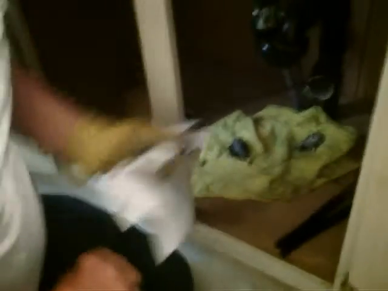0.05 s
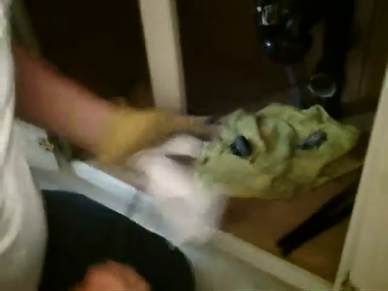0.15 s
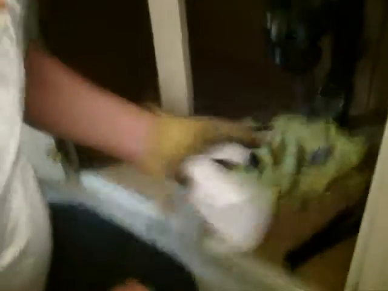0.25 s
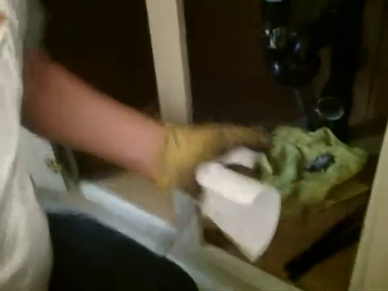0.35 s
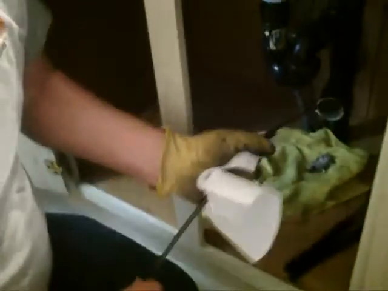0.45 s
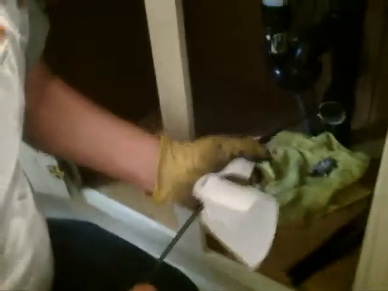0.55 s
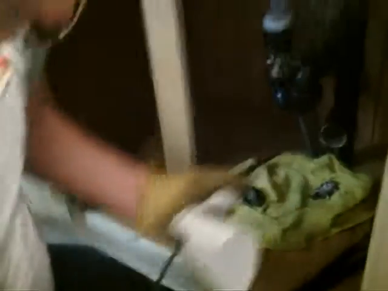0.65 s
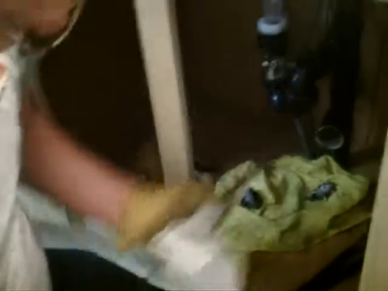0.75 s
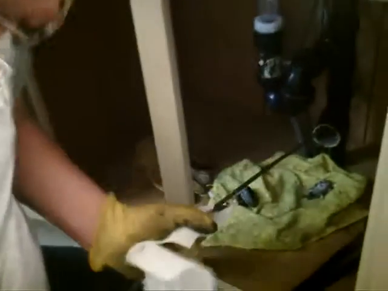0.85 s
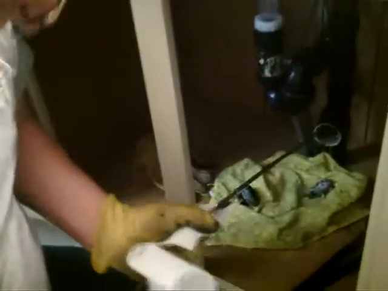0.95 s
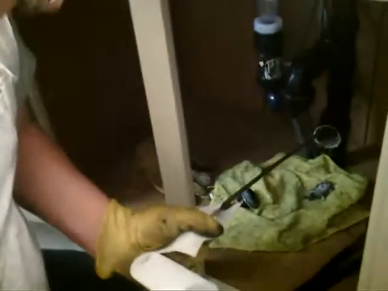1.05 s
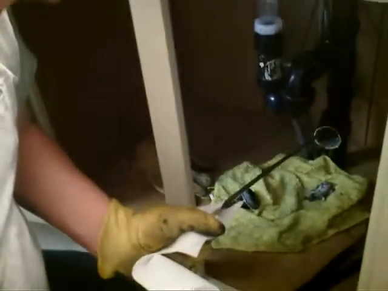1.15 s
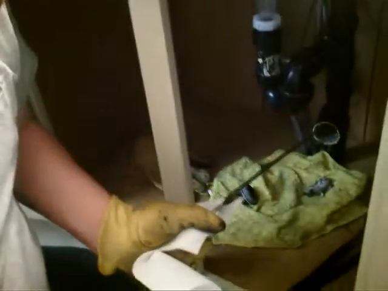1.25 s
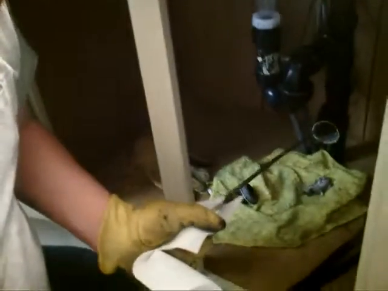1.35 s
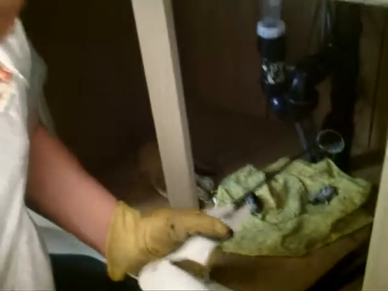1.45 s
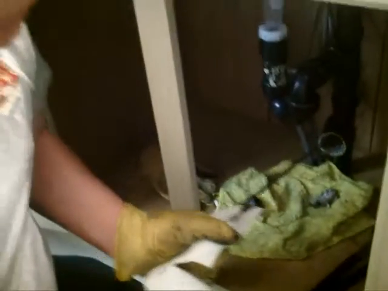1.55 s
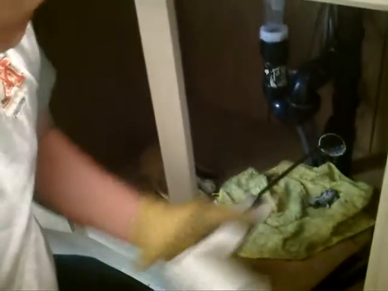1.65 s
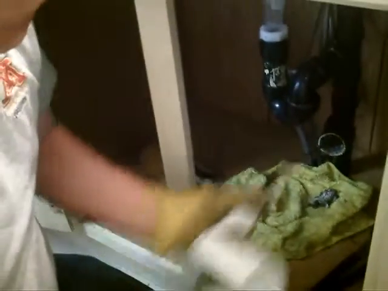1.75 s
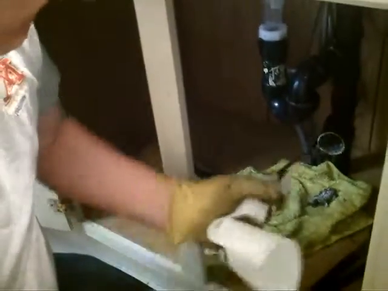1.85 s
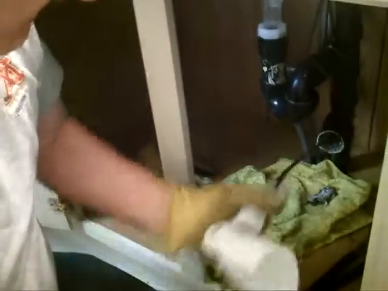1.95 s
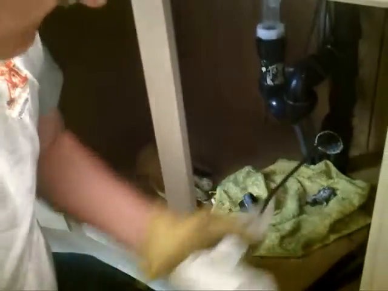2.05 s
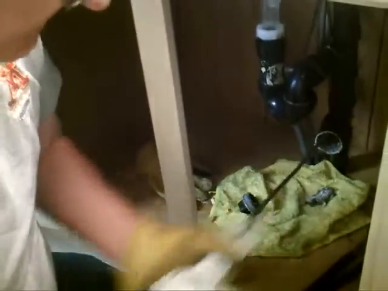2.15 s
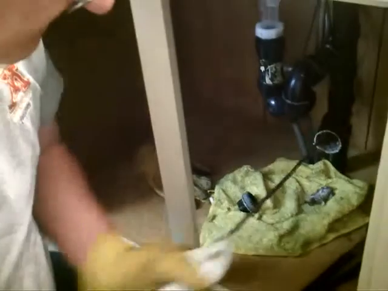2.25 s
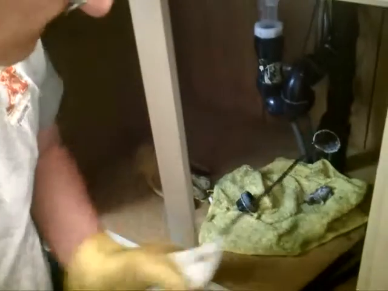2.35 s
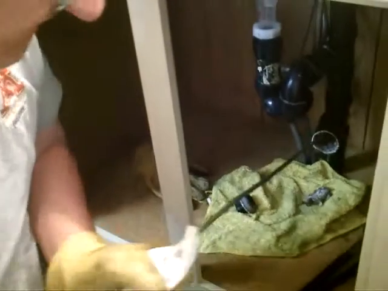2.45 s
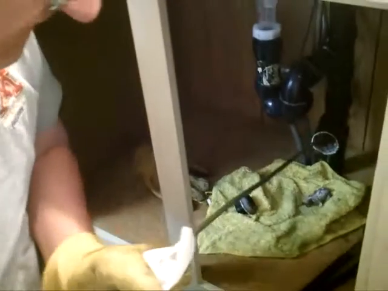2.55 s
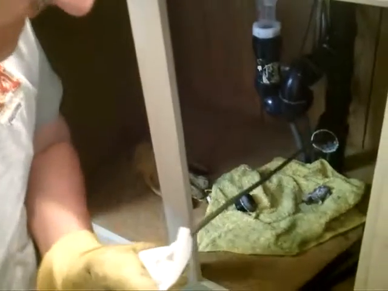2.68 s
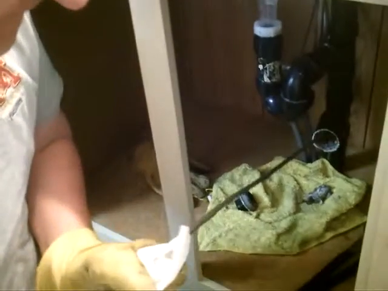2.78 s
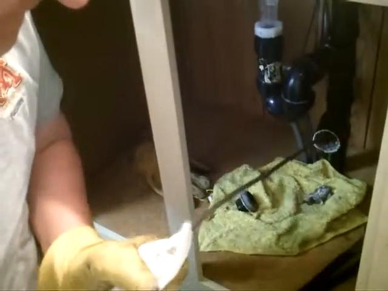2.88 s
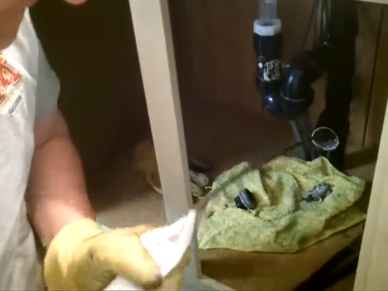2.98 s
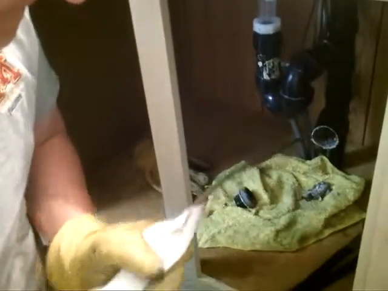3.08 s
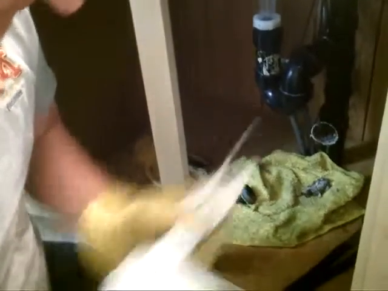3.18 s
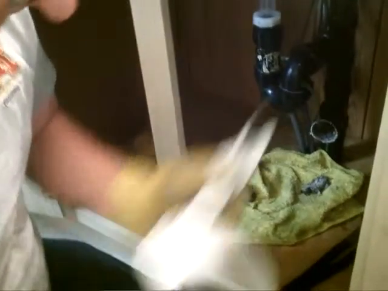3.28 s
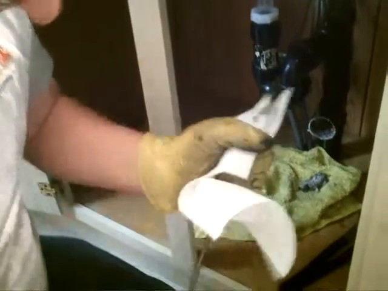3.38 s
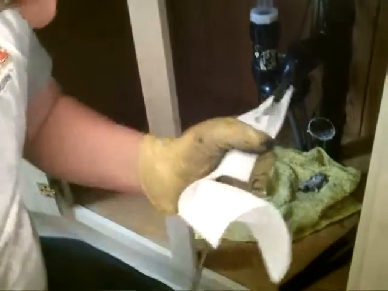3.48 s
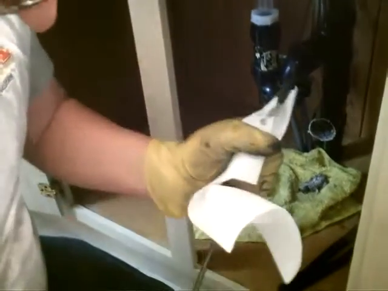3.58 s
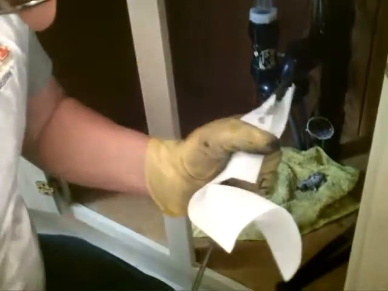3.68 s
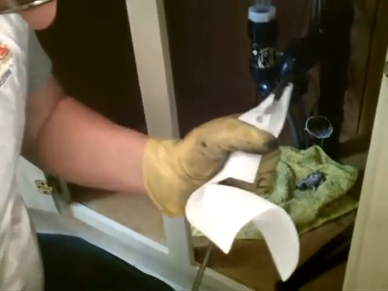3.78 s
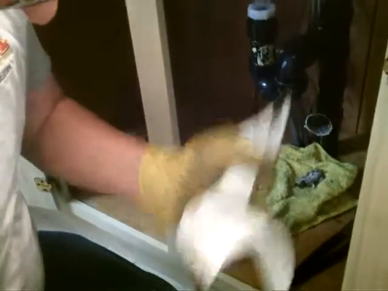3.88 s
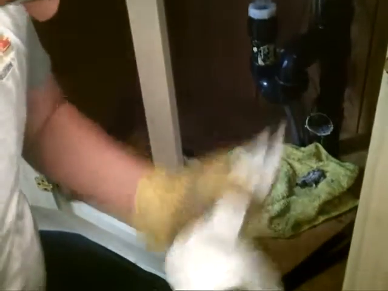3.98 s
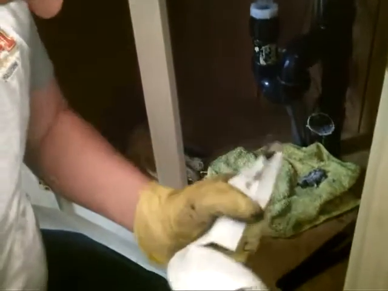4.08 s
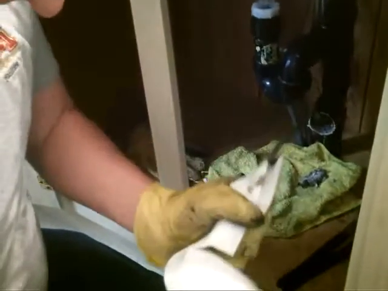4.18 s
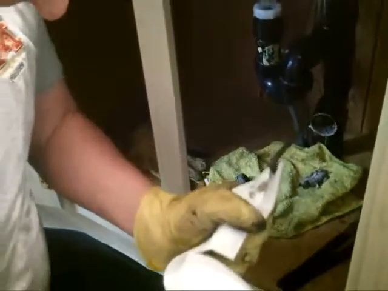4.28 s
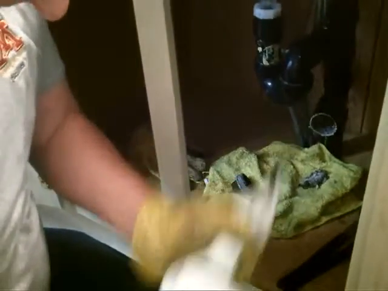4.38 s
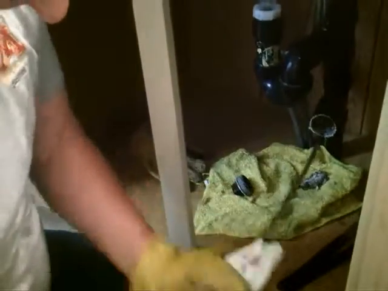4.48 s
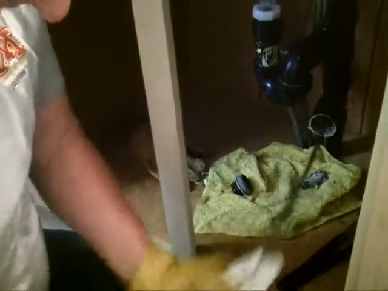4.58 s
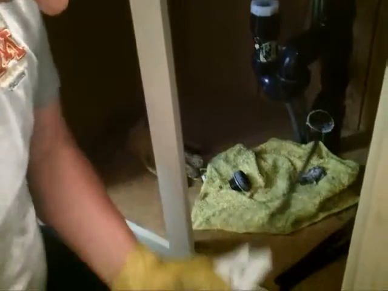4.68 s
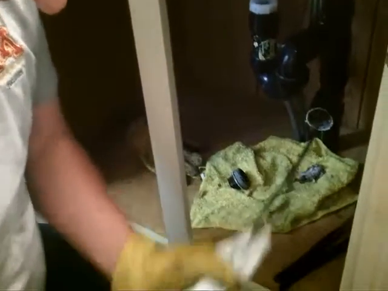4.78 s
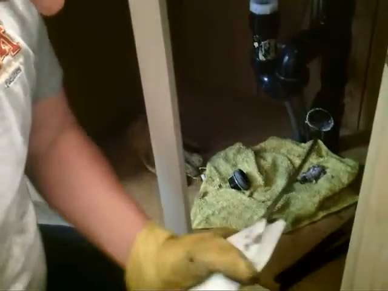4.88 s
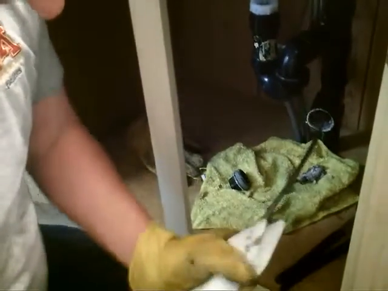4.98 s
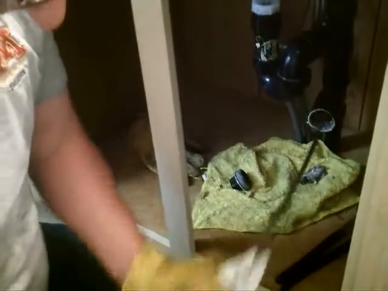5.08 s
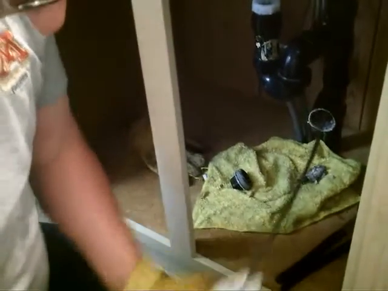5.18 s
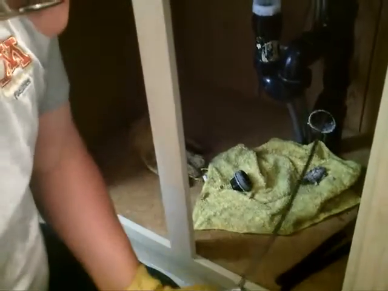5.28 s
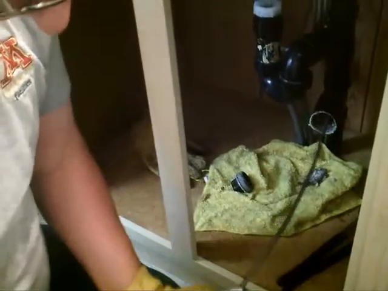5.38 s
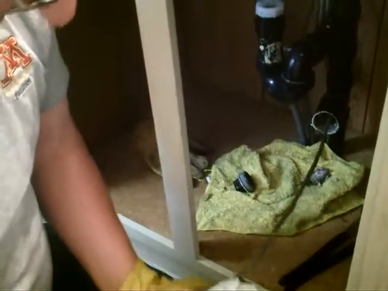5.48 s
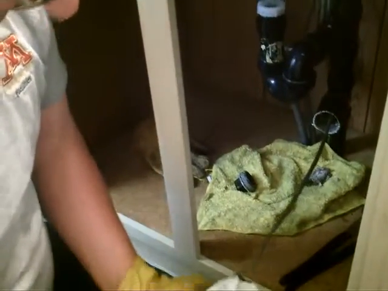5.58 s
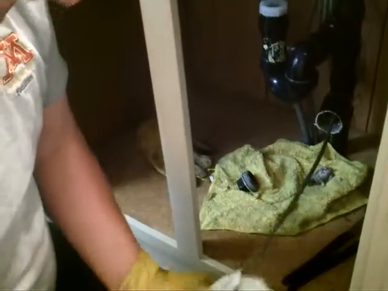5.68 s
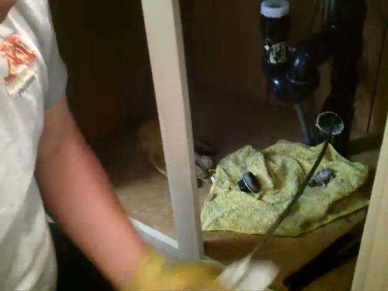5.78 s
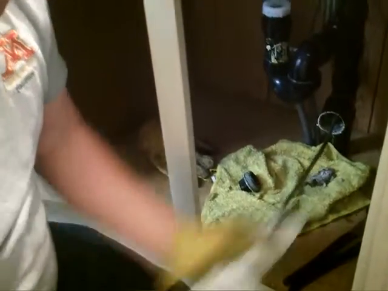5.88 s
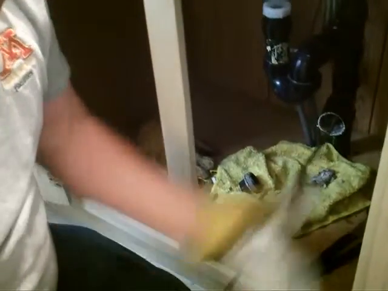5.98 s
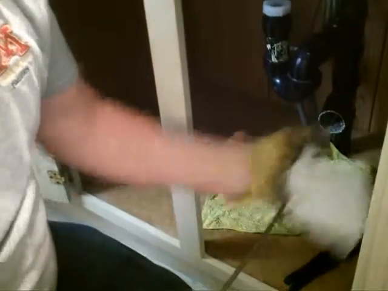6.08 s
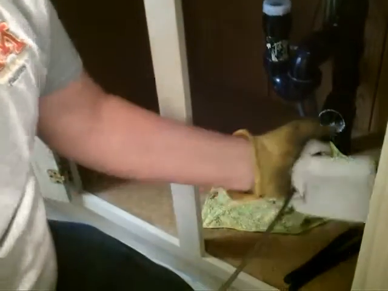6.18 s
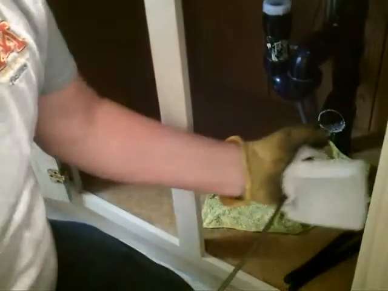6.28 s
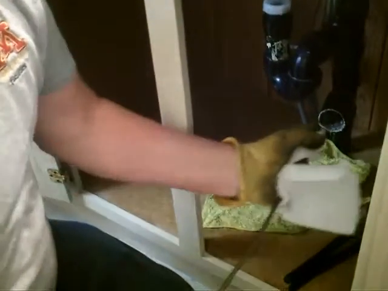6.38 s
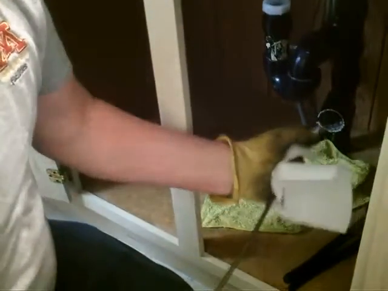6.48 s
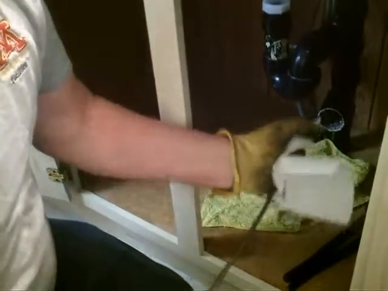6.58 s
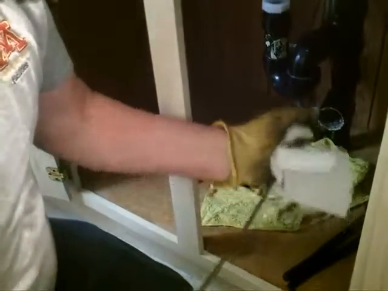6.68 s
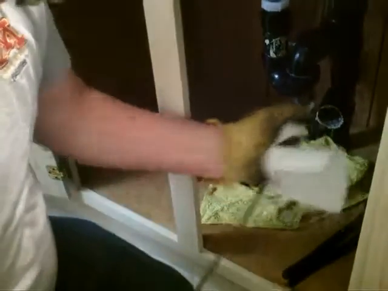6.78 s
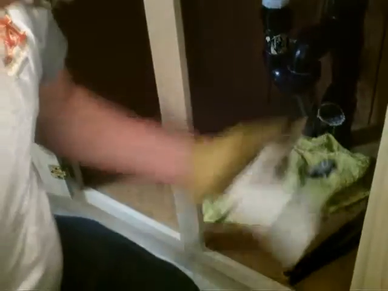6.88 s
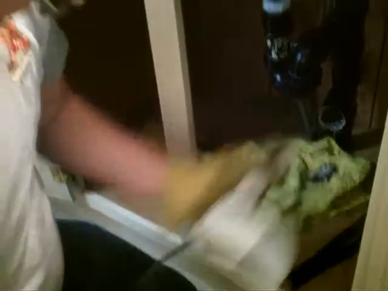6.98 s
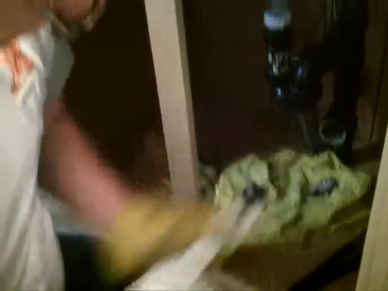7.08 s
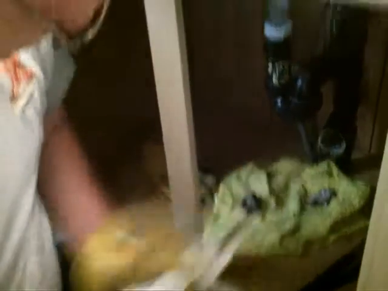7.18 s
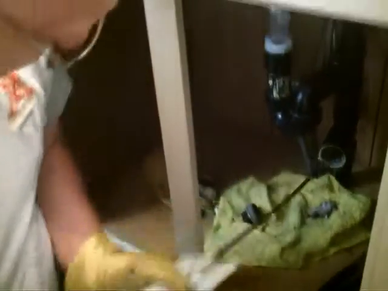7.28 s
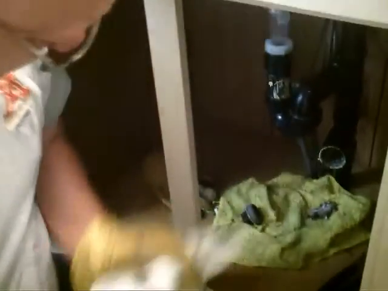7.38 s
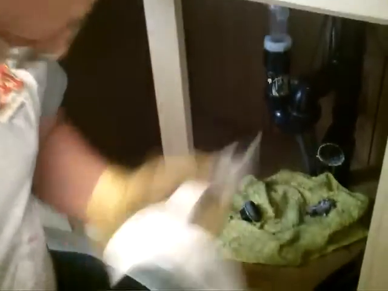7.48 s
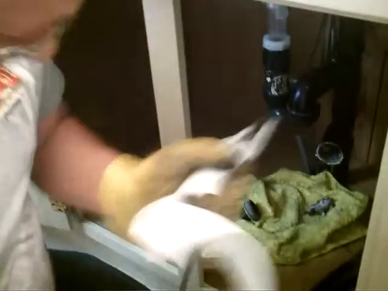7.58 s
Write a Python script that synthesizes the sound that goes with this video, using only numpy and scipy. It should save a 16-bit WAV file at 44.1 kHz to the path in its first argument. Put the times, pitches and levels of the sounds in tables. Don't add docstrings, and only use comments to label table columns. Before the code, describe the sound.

Close, abrupt scrapes and clacks of a wound metal cable dragged through a rag and over a pipe lip, in a small hard room with faint hiss.

```python
import sys
import numpy as np
from scipy import signal
from scipy.fft import rfft, irfft, next_fast_len
from scipy.io import wavfile
from scipy.ndimage import uniform_filter1d

SR = 44100
rng = np.random.default_rng(int(sys.argv[2]) if len(sys.argv) > 2 else 0)


def to_wav(sig):
    pcm = np.clip(np.atleast_2d(sig), -1, 1) * 32767
    pcm = np.round(pcm).astype(np.int16)
    wavfile.write(sys.argv[1], SR, pcm.T)


def volts_from_db(level):
    exponent = np.asarray(level, float) / 20
    return 10 ** exponent


N = 337360
T = np.arange(N) / SR
CONTROL_T = T[::64]


def unit(x):
    return x / np.sqrt(np.mean(x ** 2))


def band(x, lo_hz, hi_hz, order=3):
    return signal.sosfilt(signal.butter(order, [lo_hz, hi_hz], "bandpass", fs=SR, output="sos"), x)


def colour(x, table):
    hz, db = np.transpose(table)
    size = next_fast_len(len(x))
    f = np.maximum(np.arange(size // 2 + 1) * SR / size, 1)
    gain = volts_from_db(np.interp(np.log(f), np.log(hz), db))
    return irfft(rfft(x, size) * gain, size)[:len(x)]


def ring(x, modes):
    out = 0
    for k, (hz, width_hz, db) in enumerate(modes):
        out = out + (-1) ** k * volts_from_db(db) * signal.lfilter(*signal.iirpeak(hz, hz / width_hz, SR), x)
    return out


def walk(rate_hz):
    k = int(SR / rate_hz)
    return 1.147 * uniform_filter1d(np.repeat(rng.standard_normal(N // k + 1), k), k)[:N]


def slips(per_s, spread_db):
    hit = rng.random(N) < per_s / SR
    size_db = spread_db * np.minimum(rng.exponential(size=N), 4.0)
    return unit(hit * rng.standard_normal(N) * volts_from_db(size_db))


def to_audio_rate(control):
    return np.interp(T, CONTROL_T, control)


def swell(s, db, rise_s, hold_s, fall_db_s):
    rise_s, hold_s, fall_db_s = (np.reshape(v, (-1, 1)) for v in (rise_s, hold_s, fall_db_s))
    t = CONTROL_T - s[:, None]
    rise_db = 57 * (np.minimum(t, 0) / np.maximum(rise_s, .002)) ** 2
    return volts_from_db(2 * (db[:, None] - rise_db - np.maximum(t - hold_s, 0) * fall_db_s))


# t/s at full speed, run-up/s, hold/s, level/dB, rag squeeze/dB
HAULS = [(0.132, 0.076, 0.047, -39.5, 0), (0.255, 0.096, 0.037, -26, 3), (0.758, 0.13, 0.046, -39, 4.5),
         (0.845, 0.14, 0.064, -27, -0.5), (1.795, 0.066, 0.035, -31, -1), (1.836, 0.056, 0.032, -34.5, 0.5),
         (1.936, 0.05, .01, -44, 4), (3.445, 0.094, 0.012, -30, 1), (3.49, 0.017, 0.031, -38, 2.5),
         (4.043, 0.11, 0.015, -28, -0.5), (4.104, 0.1, 0.014, -25, 5), (4.532, 0.057, 0.057, -26.5, 5.5),
         (4.57, 0.13, 0.066, -22.5, -6.5), (5.185, 0.15, 0.039, -33.5, -1), (5.296, 0.19, 0.063, -27, 4.5),
         (6.808, 0.03, 0.027, -49.5, 5.5)]


def hauls():
    s, rise_s, hold_s, db, squeeze_db = np.transpose(HAULS)
    haul = swell(s, db, rise_s, hold_s, 425)
    wrung = swell(s, db, rise_s, hold_s, 468)
    body = haul.sum(axis=0)
    ringing = volts_from_db(2 * (2.5 + 0.97 * squeeze_db)) @ haul
    return np.array([body, ringing, volts_from_db(2 * -25.5) * body, volts_from_db(2 * (-7.5 + squeeze_db)) @ wrung])


# t/s, grip on coil/dB, rag slide/dB
WIPES = [
    [(0.93, -28.5, -40.5), (1.028, -29.5, -41.5), (1.066, -27, -42.5), (1.122, -51, -54), (1.176, -53, -78),
     (1.2, -72, -75)],
    [(2.0, -42, -58), (2.024, -56, -65), (2.05, -42.5, -50.5), (2.25, -38, -37.5), (2.478, -28.5, -38),
     (2.64, -29, -39), (2.828, -60, -62), (2.894, -44.5, -45.5), (2.96, -75, -87)],
    [(5.82, -58, -71), (5.866, -52, -57), (6.04, -58.5, -54.5), (6.06, -50, -56.5), (6.174, -49.5, -49.5),
     (6.182, -44.5, -51.5), (6.274, -52.5, -48.5), (6.284, -36.5, -46.5), (6.3, -54, -53.5)],
    [(6.87, -49, -51.5), (6.948, -27, -35), (7.018, -25, -36), (7.06, -20.5, -29), (7.146, -25, -28),
     (7.218, -30.5, -36.5), (7.342, -26.5, -34), (7.382, -23, -40), (7.47, -57, -69)],
]


def wiped(column):
    power = 0
    for rows in map(np.array, WIPES):
        outside_s = np.maximum(np.maximum(rows[0, 0] - CONTROL_T, CONTROL_T - rows[-1, 0]), 0)
        db = np.interp(CONTROL_T, rows[:, 0], rows[:, column])
        power = power + volts_from_db(2 * (db - 402 * outside_s))
    return power


def wipes():
    held, slide = wiped(column=1), wiped(column=2)
    return np.array([held * volts_from_db(2 * -2.5), held * volts_from_db(2 * -5), held * volts_from_db(2 * -26.5), slide * volts_from_db(2 * 5)])


# t/s, level/dB, hold/s, fall/(dB/s), ring re body/dB
SHUDDERS = [(0.085, -34.5, 0.068, 200, -2.5), (0.501, -27.5, 0.0044, 295, -4.5),
            (0.67, -39, 0.011, 400, -13), (0.712, -30, 0.1, 200, -10), (1.23, -46, .005, 500, -4),
            (1.276, -33.5, 0.0039, 340, -17), (1.598, -47.5, 0.086, 300, -0.5),
            (1.912, -24, 0.018, 292, -27), (3.588, -34, 0.02, 223, -2.5), (3.883, -51.5, 0.024, 400, -1.5),
            (3.975, -43.5, .02, 200, -13), (4.49, -40, .02, 200, 0.5), (4.947, -48.5, 0.065, 300, 2),
            (5.027, -33.5, 0.072, 200, -3), (5.562, -44.5, 0.004, 200, 1.5), (5.584, -50, 0.018, 300, -7),
            (5.751, -52, 0.015, 297, -9), (6.284, -49.5, 0.014, 151, 1), (6.758, -42, 0.11, 300, -6),
            (7.588, -49, 0.041, 200, -2)]
SETTLES = [
    (0.062, -55.5, 0.023, 200, -8),
    (0.356, -52.5, 0.034, 155, 2.5),
    (0.503, -44.5, .02, 300, -8.5),
    (1.33, -55, .01, 146, -12),
    (4.163, -42.5, 0.012, 170, -12),
    (4.685, -48.5, 0.019, 52, -3.5),
    (5.396, -42, 0.0081, 91, -8),
    (5.63, -67.5, 0.13, 100, 10.5),
    (6.414, -61.5, 0.28, 202, -2),
    (7.464, -52, 0.078, 150, -4),
]


def jolts():
    s, db, hold_s, fall_db_s, ring_db = np.transpose(SHUDDERS + SETTLES)
    counts = [len(SHUDDERS), len(SETTLES)]
    loose = swell(s, db, np.repeat([0.0045, 0.13], counts), hold_s, fall_db_s)
    rag_db = ring_db + np.repeat([-16, -2], counts)
    body = loose.sum(axis=0)
    return np.array([body, volts_from_db(2 * ring_db) @ loose, volts_from_db(2 * -21) * body, volts_from_db(2 * rag_db) @ loose])


# t/s, level/dB, hold/s
THUMPS = [
    (1.79, -56, 0.017),
    (0.5, -57, .02),
    (4.11, -56, 0.016),
    (1.915, -38.5, 0.02),
    (2.665, -50.5, 0.025),
    (4.61, -43.5, 0.022),
    (5.025, -41, 0.076),
    (6.805, -54, 0.11),
    (7.41, -56, 0.025),
]


def thumps():
    s, db, hold_s = np.transpose(THUMPS)
    return swell(s, db, 0.022, hold_s, 208).sum(axis=0)


def contact():
    power = hauls() + jolts() + wipes()
    power[2] += thumps()
    return [to_audio_rate(10 * np.log10(p + 1e-12)) for p in power]


# f/Hz, width/Hz, level/dB
PIPE = [(460.7, 39, -6), (557.5, 24.8, -1), (705, 60, -2.5), (783.6, 41, 0), (898, 116, -4),
        (1080, 65, -2.5), (1457, 265, -0.5), (1715, 193, 1.5), (1826, 172, 0.5), (2140, 170, -1),
        (2210, 320, -5.5), (2698, 66, -7), (2760, 260, -15), (3590, 2300, -17.5)]
# f/Hz, width/Hz, level/dB
GRIP = [(420, 173, -7.5), (527, 20.6, 3.5), (636, 103, -3), (952, 110, -6), (1025, 46, 0), (1320, 240, -1),
        (1313, 290, 0), (1730, 143, -1), (2015, 81, -0.5), (2410, 390, -2), (2770, 81, -1.5),
        (2970, 110, -11)]
# f/Hz, width/Hz, level/dB
COIL = [(3640, 29, -23), (4600, 110, 0), (5040, 78, -7.5), (5530, 70, 4), (6275, 60, -3), (8100, 65, 5),
        (8930, 60, -5), (9200, 85, 2), (10770, 92, -16.5), (11400, 100, 3.5), (12600, 80, -16),
        (13100, 200, 0)]
# f/Hz, level/(dB per Hz)
RAG_FAST = [(1650, -20), (2800, 1), (3690, -6.5), (4520, -8), (5530, -7), (6120, -6.5), (6680, -9),
            (9310, -9), (14600, -13), (15800, -15)]
# f/Hz, level/(dB per Hz)
RAG_SLOW = [(1650, -2), (2800, -16), (3200, -15.5), (4200, -10), (6200, -14), (8200, -11.5), (11500, -15.5),
            (15800, -20)]


def rub(grip, distinct, turns):
    body_db, *others = contact()
    ring_db, thud_db, rag_db = others - body_db
    inside = sum(1. * (T > rows[0][0]) * (T < rows[-1][0]) for rows in WIPES)
    wipe = uniform_filter1d(inside, size=SR // 30)
    haul = 1 - wipe
    rake = slips(3500, 1.4) * volts_from_db(walk(45) + .7 * walk(21))
    drag = slips(6000, 0.31) * volts_from_db(walk(40)) * (1 + 1.42 * grip * turns)
    taps = np.exp(25 * (turns - 1)) * volts_from_db(4 * walk(150))
    drag += .5 * distinct * unit(band(taps, 1300, 7000))
    steel = haul * unit(ring(rake, PIPE)) + wipe * unit(ring(drag, GRIP))

    fibres = 0.34 * (haul * rake + wipe * drag) + rng.standard_normal(N)
    fibres *= volts_from_db((2.0 - 0.61 * wipe) * walk(70))
    slow_rag = unit(colour(fibres, RAG_SLOW)) + volts_from_db(-9) * unit(ring(fibres, COIL))
    rag = haul * unit(colour(fibres, RAG_FAST)) + wipe * slow_rag

    layers = volts_from_db(-11 * grip) * unit(band(steel, 392, 1010))
    layers += volts_from_db(ring_db) * unit(band(steel, 1190, 4500))
    layers += volts_from_db(thud_db - 8.4 * grip) * unit(band(rake, 200.4, 286, order=2))
    layers += volts_from_db(rag_db) * band(rag, 1760, 22000, order=2)
    layers += volts_from_db(-37 + 4.2 * wipe) * unit(band(fibres, 64, 205, order=1))
    return volts_from_db(body_db - 2.0) * layers


# t/s, rate/Hz, buzz level/dB
BUZZES = [
    [(2.3, 285, -46), (2.41, 314, -38.5), (2.455, 283, -44), (2.487, 267, -35.5), (2.518, 277, -34.5),
     (2.538, 275, -48), (2.558, 264, -33.5), (2.6, 222, -44), (2.68, 190, -52)],
    [(4.535, 345, -27), (4.556, 406, -21), (4.566, 444, -20), (4.58, 445, -26), (4.6, 350, -22),
     (4.615, 390, -31), (4.635, 425, -30)],
    [(5.99, 375, -62), (6.04, 390, -58), (6.068, 412, -53.5), (6.128, 480, -56), (6.152, 490, -55),
     (6.168, 600, -55), (6.19, 620, -49), (6.25, 625, -59)],
    [(6.92, 175, -53), (6.992, 248, -39.5), (7.022, 268, -31.5), (7.04, 285, -40), (7.078, 332, -28),
     (7.16, 365, -30.5), (7.2, 400, -47), (7.3, 440, -44), (7.41, 270, -50)],
]
# f/Hz, level/dB
BUZZ_COLOUR = [(200, -10.5), (330, -9.5), (560, 4), (760, -5.5), (1100, -9), (1600, -24), (2500, -30)]
BUZZ_GRIP_DB = [
    (-2, 0, -5, -5, -3, 2),
    (-5, 5, -6, 4, 0, 0),
    (-2, 3, 9, 12, 15, 15),
    (-2, 0, 4, 8, 12, 16),
]


def buzz():
    s, rate_hz, db = np.concatenate(BUZZES).T
    rate_hz, db = np.interp(T, s, rate_hz), np.interp(T, s, db)
    phase = 2 * np.pi * np.cumsum(rate_hz * (1 + .005 * walk(90))) / SR
    hz, colour_db = np.transpose(BUZZ_COLOUR)
    grip_db = np.repeat(BUZZ_GRIP_DB, [len(rows) for rows in BUZZES], axis=0).T
    stack = 0
    for k, partial_db in enumerate(grip_db, start=1):
        level_db = db + np.interp(T, s, partial_db) + np.interp(np.log(k * rate_hz), np.log(hz), colour_db)
        flicker_db = (.3 + .6 * k) * walk(60)
        stack = stack + volts_from_db(level_db + flicker_db) * np.sin(k * phase)
    grip = 0
    for rows in BUZZES:
        start, end = rows[0][0], rows[-1][0]
        grip = grip + np.clip(np.minimum(T - start, end - T) / (.15 * (end - start)), 0, 1)
    distinct = grip * np.clip((410 - rate_hz) / 50, 0, 1)
    return np.sqrt(2) * grip * stack, grip, distinct, np.cos(phase)


# t/s, peak/dB, f/Hz, snap re peak/dB, treble re peak/dB
BLOWS = [(0.498, -13, 805, 3, -22), (0.5015, -12, 1510, -8, -34), (1.9285, -7, 750, -5, -29),
         (0.7077, -6, 892, -8, -28), (0.7098, -8.5, 1460, -13, -32), (0.732, -13.5, 1600, -20, -33),
         (0.747, -18, 850, -15, -27), (1.274, -19, 895, -10, -28), (3.557, -28, 1690, -4, -20),
         (3.5869, -18.5, 1500, -6.5, -25), (5.0085, -8, 980, -14, -27), (5.0104, -11, 1630, -14, -24),
         (5.028, -18.5, 840, -9, -32), (5.074, -13, 895, -8.5, -32), (5.1265, -17, 1800, -8, -18),
         (5.097, -17, 850, -16, -30), (5.559, -21, 1880, -17, -31), (6.7635, -22.5, 1060, -15, -28)]
SNAGS = [(0.829, -14.5, 1500, -2, -22), (0.839, -10.5, 2660, -2, -13), (0.889, -8.5, 1570, -6.5, -24),
         (1.909, -18, 447, -30, -34), (1.918, -11.5, 700, -20, -33), (7.055, -17, 1750, -6, -11),
         (7.075, -10.5, 1060, -4, -16), (7.132, -15, 2000, -1, -2), (4.626, -11, 1900, -2, -18),
         (0.877, -21, 900, -13, -22), (1.941, -14.5, 555, -18, -37), (3.407, -20, 1700, -2, -9.5),
         (3.452, -8, 1770, -3, -22), (3.504, -13, 1650, -18, -18), (4.046, -10, 1780, -12, -21),
         (4.108, -6.5, 790, -5, -15.5), (4.544, -12, 1540, -22, -28), (4.585, -6, 1700, -2, -17),
         (4.594, -8, 690, -6, -17), (4.511, -17, 940, -8, -20), (4.523, -16, 1640, -8, -20),
         (.229, -14, 1410, -10, -22), (.296, -12, 800, -6, -20), (3.421, -19, 1760, -8, -20),
         (3.436, -13, 1470, -8, -20), (4.029, -14, 1770, -8, -20), (4.097, -10, 1800, -8, -20),
         (5.267, -13, 1630, -8, -20), (.842, -15, 750, -15, -30), (5.315, -12, 1520, -10, -22),
         (5.288, -5.5, 1720, -4.5, -21), (5.343, -14.5, 1490, -18, -16), (5.159, -27, 925, -22, -7),
         (5.234, -16.5, 1980, -18, -7.5)]
# t/s, peak/dB, f/Hz, treble re peak/dB
TAPS = [(0.082, -30, 710, -27), (0.396, -33, 666, -24), (0.645, -33, 700, -30), (0.665, -29, 1000, -28),
        (0.479, -33, 880, -20), (1.224, -33, 1340, -24), (1.603, -33, 705, -24), (1.646, -34.5, 656, -30),
        (3.219, -54, 2010, -17), (3.386, -30, 724, -8), (3.768, -41.5, 1460, -16), (3.888, -43, 1570, -27),
        (3.98, -27, 730, -23), (4.287, -33.5, 1530, -29), (4.487, -30, 1570, -21), (4.749, -38, 1300, 3),
        (4.801, -37.5, 1610, -24), (4.953, -34, 1910, 0), (4.977, -30, 1700, -24), (3.671, -38, 1490, -18),
        (5.585, -32.5, 920, -28), (5.766, -41, 1130, -20), (5.859, -37, 780, -19), (5.944, -38.5, 470, -16),
        (6.282, -28, 680, -15), (6.564, -38, 1450, -24), (6.647, -34.5, 1050, -30),
        (7.455, -30.5, 705, -29), (7.559, -32, 700, -30), (3.396, -45, 3300, -10), (3.994, -28, 3570, -16),
        (4.006, -24, 1800, -23), (4.7316, -37, 1510, -20), (6.3375, -43, 2100, -20),
        (1.7514, -41, 1510, -18), (1.737, -42, 1520, -20), (6.8997, -34, 1210, -17),
        (0.1136, -27, 1520, -24), (7.5817, -29.5, 900, -15)]
CONTACT = [3.5, 0, 3.5]
OWN_WIDTH_HZ = [86, 134, 160]


def knocks():
    taps = [(s, db, hz, -8, treble_db) for s, db, hz, treble_db in TAPS]
    s, db, hz, snap_db, treble_db = np.transpose(BLOWS + SNAGS + taps)
    counts = [len(BLOWS), len(SNAGS), len(TAPS)]
    t60_s = np.repeat([0.024, 0.04, 0.032], counts)[:, None]
    t = T[:SR // 11]
    rattle = rng.standard_normal((len(s), len(t))) * np.exp(-np.log(1000) * t / t60_s)
    rattle *= 1 - np.exp(-t / (60 * t60_s ** 3))
    rattle[:, 8] += np.repeat(CONTACT, counts)
    width_hz = np.repeat(OWN_WIDTH_HZ, counts)
    own = np.array([unit(ring(x, [(f, w, 0)])) for x, f, w in zip(rattle, hz, width_hz)])
    pipe = ring(rattle, PIPE)
    body = band(pipe / pipe.std(axis=1, keepdims=True) + 1.07 * own, 450, 2940, order=2)
    snap = band(rattle, 1420, 3860, order=4)
    crack = band(rattle * np.exp(-t / .004), 5200, 12600, order=2)
    hits = 0
    for part, peak_db in (body, db - 2.5), (snap, db + snap_db - 1.0), (crack, db + treble_db + 1.5):
        hits = hits + volts_from_db(peak_db)[:, None] * part / np.abs(part).max(axis=1, keepdims=True)
    out = np.zeros(N + len(t))
    for i, hit in zip((s * SR).astype(int), hits):
        out[i:i + len(t)] += hit
    return out[:N]


def steady(x):
    return unit(x / (uniform_filter1d(np.abs(x), size=SR // 100) + 1e-9) ** .6)


# t/s, hold/s, f/Hz, width/Hz, level/dB
SINGS = [(.24, .06, 3340, 400, -38), (1.813, 0.041, 1580, 200, -36.5), (2.174, 0.41, 4020, 90, -48),
         (2.344, 0.32, 1725, 89, -40), (2.39, 0.14, 2360, 149, -38), (3.428, 0.027, 3360, 300, -33.5),
         (4.028, 0.071, 3500, 400, -34.5), (4.528, 0.054, 3400, 400, -33), (.24, .028, 1470, 80, -29),
         (1.79, .05, 450, 70, -39), (1.925, .015, 450, 80, -32), (.508, .03, 570, 60, -39),
         (2.56, .015, 1030, 60, -37), (.242, .035, 810, 70, -27), (.9, .04, 590, 50, -30),
         (1.035, .045, 610, 50, -36), (.98, .025, 2070, 60, -38), (3.44, .022, 1470, 80, -27),
         (1.932, .014, 1520, 100, -29), (1.81, .02, 720, 70, -33), (5.35, .02, 870, 90, -30),
         (4.545, .012, 1530, 90, -24), (5.263, 0.066, 3640, 400, -40), (7.06, 0.09, 4130, 90, -37),
         (7.18, .2, 4020, 70, -43.5), (7.27, 0.13, 1670, 100, -38.5), (7.325, 0.032, 2470, 150, -39),
         (7.045, .11, 2800, 500, -31.5), (0.514, .03, 1480, 90, -49), (2.058, 0.083, 1020, 80, -51.5),
         (7.365, 0.035, 530, 140, -39), (5.277, 0.073, 1630, 250, -25.5)]
# t/s, level/dB, hold/s
FLICKS = [
    (6.774, -49.5, 0.013),
    (6.808, -45, .04),
    (6.865, -58, .005),
    (7.05, -50, 0.0068),
    (7.135, -42, .008),
    (5.964, -56.5, 0.296),
]


def sing():
    s, hold_s, hz, width_hz, db = np.transpose(SINGS)
    gains = np.sqrt(swell(s, db, np.minimum(0.065, 1.5 * hold_s), hold_s, 420))
    fine = slips(5000, 2.0) * volts_from_db(2.0 * walk(60))
    out = sum(to_audio_rate(g) * steady(ring(fine, [(f, w, 0)])) for g, f, w in zip(gains, hz, width_hz))
    s, db, hold_s = np.transpose(FLICKS)
    flick = np.sqrt(swell(s, db, .02, hold_s, 700).sum(axis=0))
    breath = unit(band(fine, 6000, 20000, order=1))
    return band(out, 300, 9000, order=2) + to_audio_rate(flick) * breath


def echoes():
    t = T[:SR // 2]
    t60_s, treble_t60_s = 0.19, 0.044
    low = band(rng.standard_normal(len(t)), 118, 1960, order=1) * np.exp(-np.log(1000) * t / t60_s)
    high = band(rng.standard_normal(len(t)), 2200, 17000, order=1) * np.exp(-np.log(1000) * t / treble_t60_s)
    return (low + high) * np.minimum(t / 0.0076, 1) / np.sqrt(np.sum(low ** 2))


def room(x, count=3):
    share = np.cos(np.pi * (T / 2.49 - np.arange(count)[:, None] / count)) ** 2
    return sum(signal.oaconvolve(x * g, echoes())[:N] for g in share)


# f/Hz, level/(dB per Hz)
HISS = [(15, -53), (25, -13), (55, -19), (157, -13), (211, -10), (333, -8), (414, 1), (691, -2.5),
        (812, -1.5), (1180, -0.5), (3680, -5.5), (13400, -8.5), (15800, -3.5)]
# f/Hz, level/dB
WHINE = [
    (15735, -70),
]


def camera():
    hiss = volts_from_db(-56.5 + .5 * walk(6)) * unit(colour(rng.standard_normal(N), HISS))
    throb = 1 + .6 * np.cos(2 * np.pi * 12.88 * (T - .027))
    whine = sum(np.sqrt(2) * volts_from_db(db) * np.sin(2 * np.pi * hz * T) for hz, db in WHINE)
    return hiss + whine * throb


def scene():
    tone, *turns = buzz()
    cable = rub(*turns) + knocks() + tone + sing()
    mono = cable + volts_from_db(-13.5) * room(cable) + camera()
    return np.array([mono, mono])


def band_limit(x):
    return signal.sosfilt(signal.butter(12, 16480, fs=SR, output="sos"), x)


def record(dry):
    top_hz = 15800
    rounded = np.tanh(.8 * dry[0]) / .8
    cut = colour(rounded, [(20, 0), (top_hz, 0), (top_hz + 130, -60), (top_hz + 300, -90)])
    return band_limit(np.array([cut, cut]))


dry = scene()
out = record(dry)
to_wav(out)
```